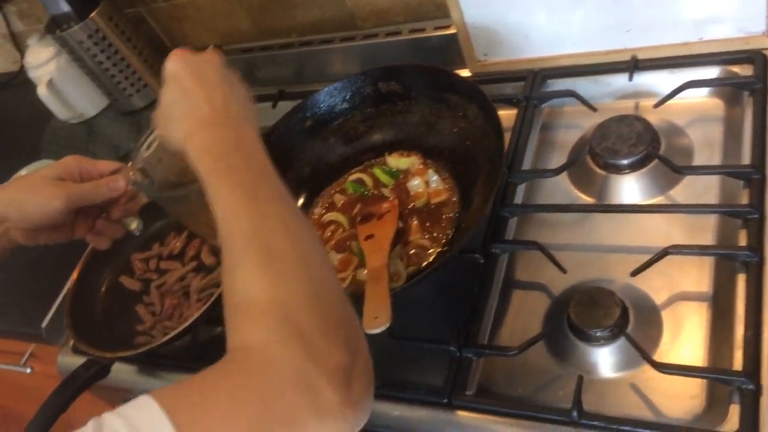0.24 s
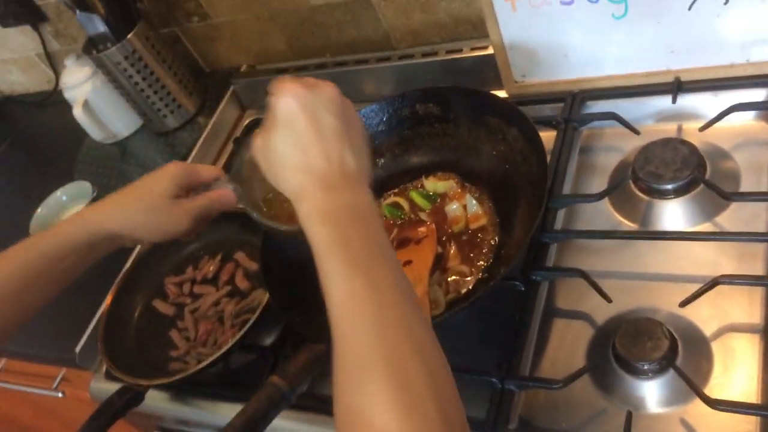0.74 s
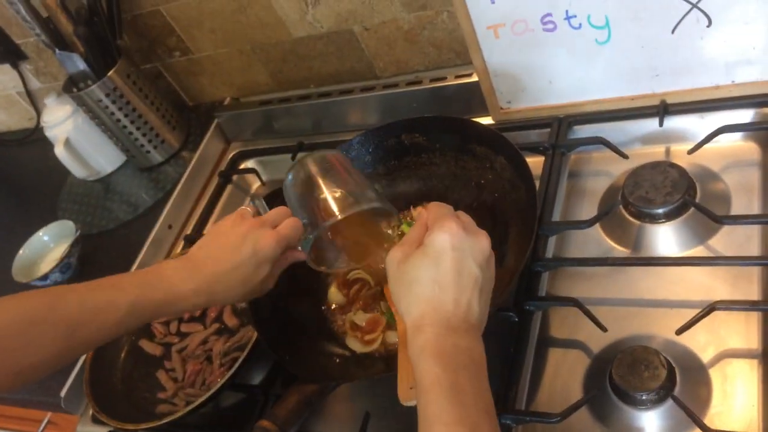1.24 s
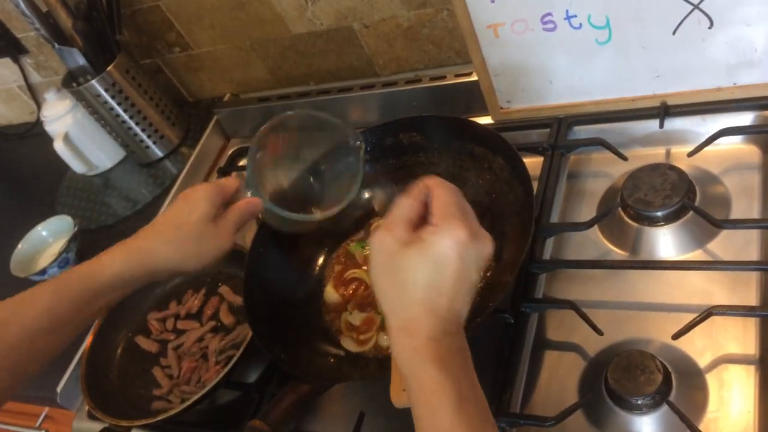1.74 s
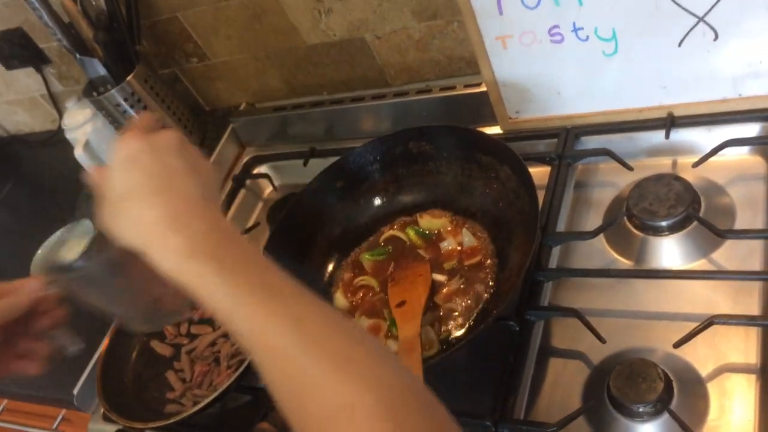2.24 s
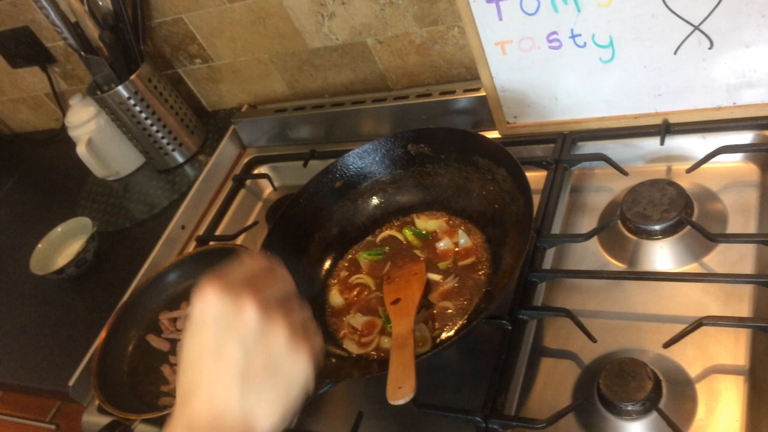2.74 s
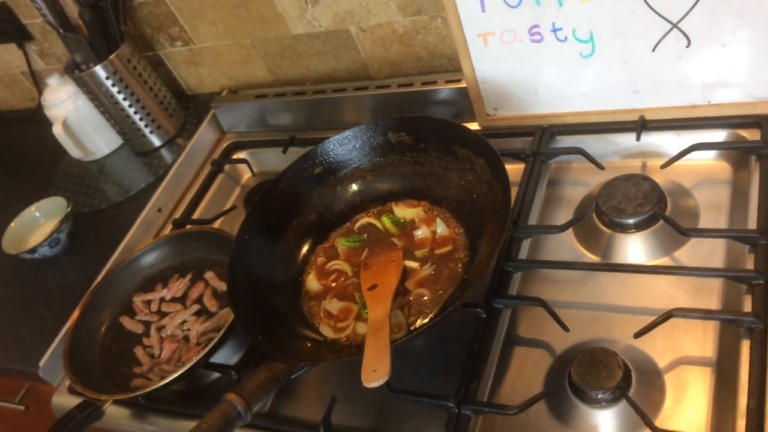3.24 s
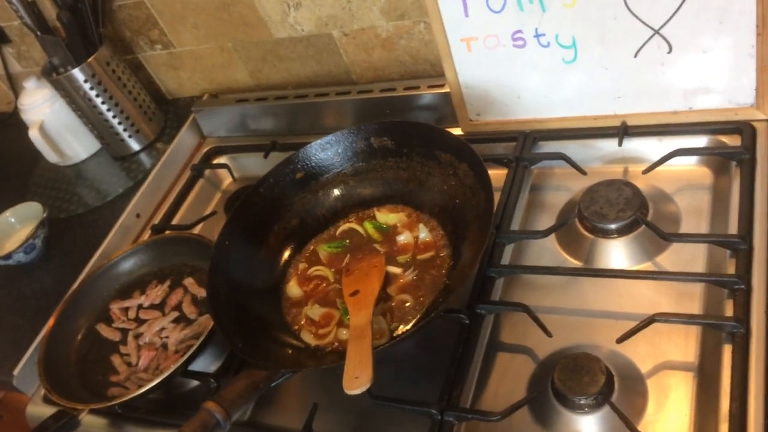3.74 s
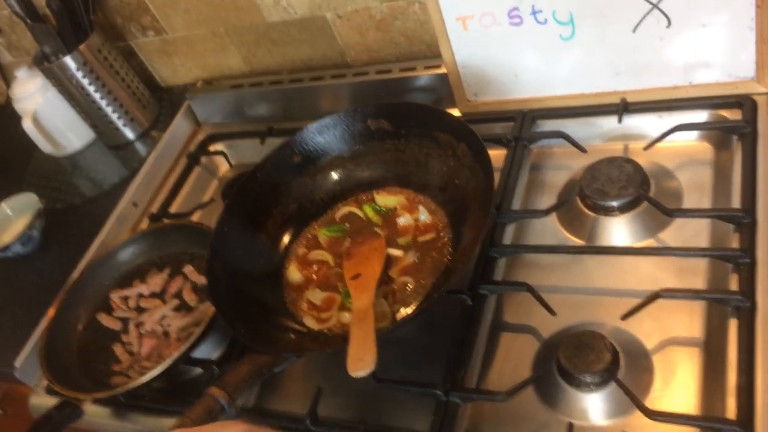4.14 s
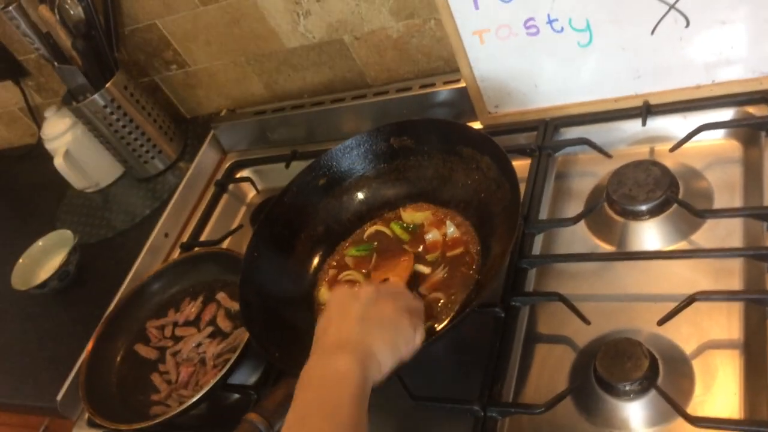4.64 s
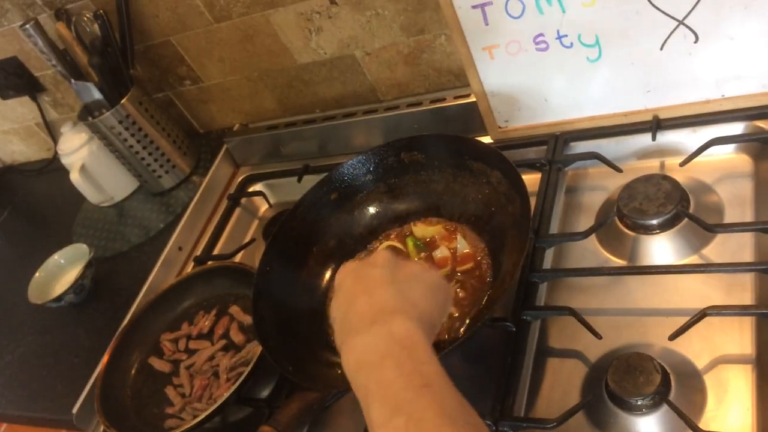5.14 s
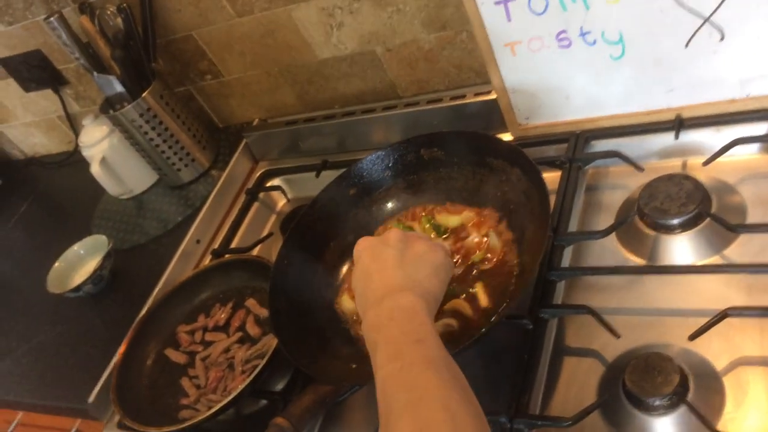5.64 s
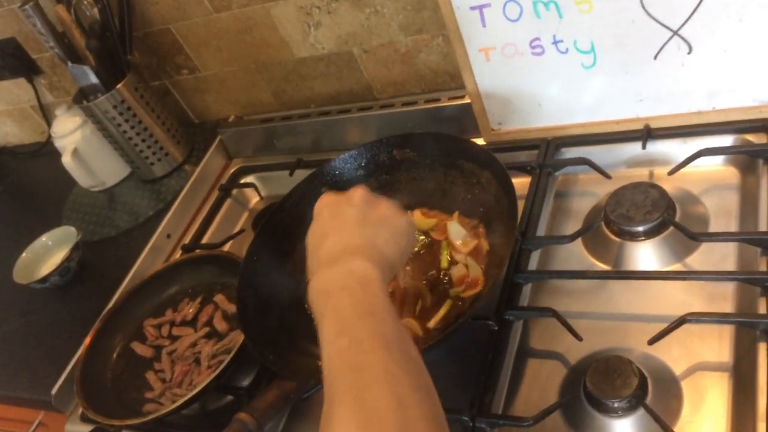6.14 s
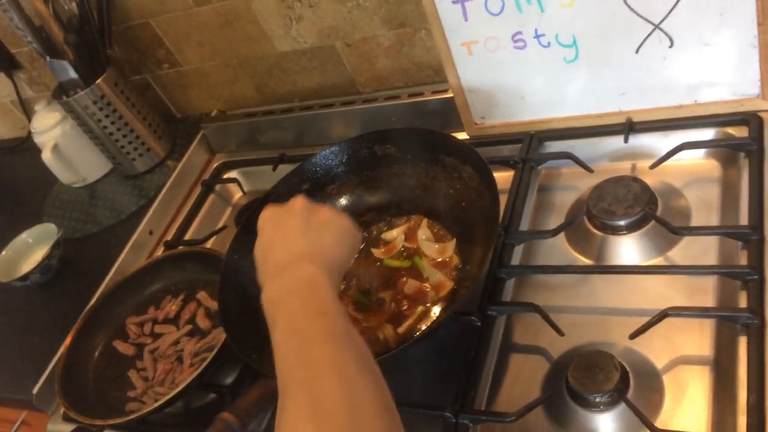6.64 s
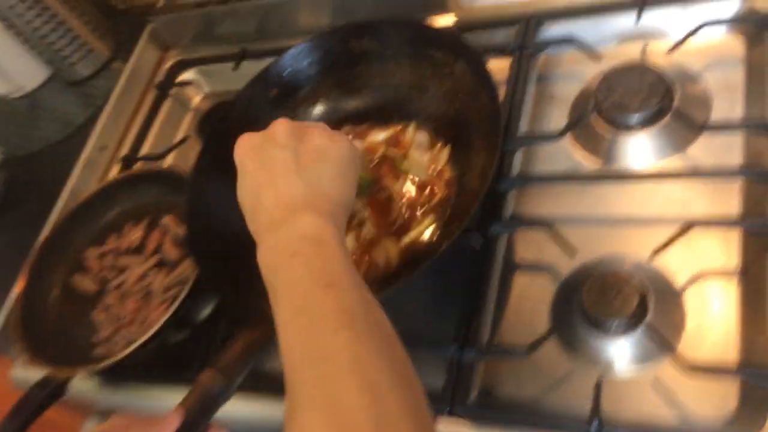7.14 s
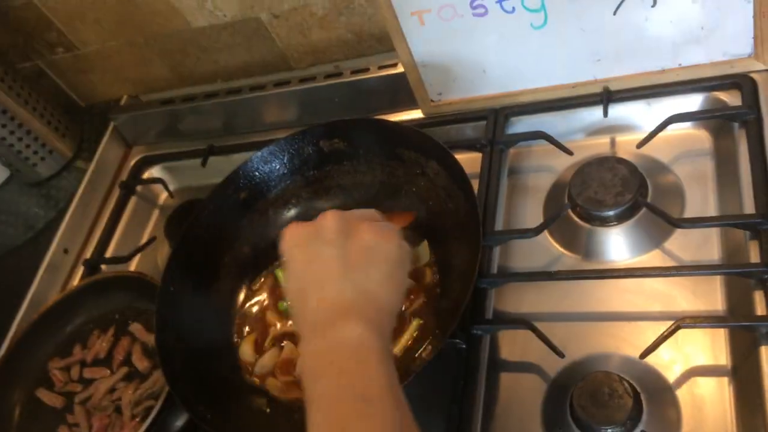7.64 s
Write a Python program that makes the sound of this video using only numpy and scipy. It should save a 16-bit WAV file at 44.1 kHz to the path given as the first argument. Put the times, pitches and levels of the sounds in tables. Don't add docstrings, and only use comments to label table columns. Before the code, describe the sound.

Close wok sizzle with a splashing hiss, glass jug rattle, a loud metallic sink clatter across the kitchen, then stirring and wooden knocks.

```python
import sys
import numpy as np
from scipy import signal
from scipy.fft import rfft, irfft
from scipy.io import wavfile
from scipy.ndimage import uniform_filter1d, minimum_filter1d

SR = 44100
rng = np.random.default_rng(int(sys.argv[2]) if len(sys.argv) > 2 else 0)


def invert_db(x):
    u = np.asarray(x, float) / 20
    return 10 ** u


def store_wav(level_fs):
    pcm = np.round(np.clip(np.atleast_2d(level_fs), -1, 1) * 32767)
    wavfile.write(sys.argv[1], SR, pcm.T.astype(np.int16))


N = 347508
T = np.arange(N) / SR

# time in seconds, level in dB.
BOIL = [(0.0, -39.5), (1.3, -38.5), (1.66, -28), (1.8, -31.5), (1.92, -33.5), (2.15, -32.5), (2.9, -36),
        (3.5, -36), (4.0, -37), (4.76, -37), (5.08, -29.5), (5.35, -35), (5.63, -20.5), (6.08, -29),
        (6.22, -25.5), (6.64, -36.5), (6.9, -36.5), (7.2, -47.5), (7.5, -38.5), (7.88, -39)]
# time in seconds, spit over boil in dB.
BARE_METAL = [(0.1, -6), (0.7, -6.5), (1.3, -1), (1.62, -2), (1.8, 0.5), (1.95, 1.5), (2.2, -3), (2.9, -5),
              (3.9, -4.5), (4.4, -3.5), (4.8, 0), (5.08, 0.5), (5.35, -1), (6.3, 1), (6.55, 4), (7.05, 5),
              (7.3, 7), (7.6, 0.5)]
# time in seconds, peak in dB.
SPURTS = [
    (0.0, -35.5),
    (0.285, -36),
    (0.55, -36),
    (1.11, -37.5),
]
# frequency in Hz, level in dB per Hz.
BOIL_COLOUR = [(150, -77), (250, -8.5), (329, -25), (370, -13.5), (670, -2), (786, -4.5), (1700, 0),
               (5100, -6), (6100, -10.5), (8000, -12.5), (10400, -51), (17600, -120)]
# frequency in Hz, level in dB per Hz.
SPIT_COLOUR = [(2940, -9), (5000, -3), (6000, -6.5), (7570, -10), (9710, -4), (11600, -5), (14200, -1.5),
               (15400, -2.5)]
# time in seconds, peak in dB, pitch in Hz.
POPS = [(0.5574, -36, 4230), (0.637, -11, 2980), (0.7544, -19, 11500), (0.7781, -6, 12200),
        (0.852, -9, 13000), (0.8936, -10, 3400), (1.0177, -8, 12000), (1.0796, -16, 4940),
        (1.112, -5, 11200), (1.106, -22, 4200), (0.106, -18, 4500), (0.128, -12, 12000),
        (0.205, -14, 11000), (0.465, -19, 4000), (0.036, -11, 12000), (0.558, -15, 9000),
        (0.576, -10, 12500), (0.587, -9, 12500), (1.784, -7, 4130), (1.919, -14, 14400), (1.9577, 3, 13800),
        (4.9057, -5, 5550), (6.808, -20, 3360), (7.149, -7, 13200), (7.265, -19, 3620)]
# time in seconds, peak in dB, pitch in Hz, length in cycles.
BUBBLES = [(0.2194, -28, 2860, 13), (0.2428, -25, 2030, 36), (0.2536, -21, 1500, 17),
           (0.278, -32, 1055, 32), (0.543, -25, 2680, 14), (0.8093, -32, 1020, 10), (1.93, -26, 2560, 25),
           (5.165, -20, 2130, 9), (7.093, -29, 2060, 15), (7.703, -30, 2000, 12), (7.7303, -27, 2020, 18)]
# time in seconds, peak in dB, pitch in Hz, length in cycles, overtone in dB.
KNOCKS = [
    (1.999, -34.5, 525, 9, -13),
    (2.225, -23, 735, 11, -20),
    (2.253, -27, 750, 7.3, -15),
    (2.266, -24, 760, 15, -15),
    (4.047, -28, 445, 5.4, -12),
    (4.323, -32.5, 425, 40, -7),
    (6.459, -31, 620, 5, -2),
    (6.905, -29, 700, 5.9, 2),
    (7.35, -22, 500, 6.2, -6),
    (7.755, -25, 475, 7.8, -26),
]

# frequency in Hz, width in Hz, level in dB.
JUG_MODES = [(1280, 39, -14), (1818, 30, -13), (2680, 170, -13), (3320, 38, -6), (3630, 34, -4),
             (4180, 60, -15), (4585, 46, -9), (5420, 29, -7.5), (6220, 68, 2), (6825, 62, 1),
             (7070, 40, -4), (7470, 47, -6), (7860, 40, -19), (8655, 26, -2.5), (9220, 38, 0.5),
             (9885, 30, -3), (10670, 22, -4.5), (11050, 24, 0), (11150, 20, -8), (11400, 50, -7),
             (11780, 37, -3), (12100, 100, -15), (12570, 29, 0), (13000, 31, -11), (13800, 40, 0),
             (14000, 55, -7), (14300, 80, -9), (14500, 50, -4), (14700, 35, -10), (15000, 45, -7),
             (15300, 28, -8)]
# start in seconds, peak in dB, brightness in dB per octave, most excited Hz.
JUG_BLOWS = [(0.0024, -15.5, 1, 7020), (0.003, -17, 0, 10800), (0.2763, -17, 2, 5420),
             (0.277, -22, 1, 10800), (0.278, -26, 0, 13400), (0.5594, -31, -8, 4230),
             (2.2255, -11, 1.5, 10800), (2.226, -10, 8, 15100), (2.23, -13, 4, 12570),
             (2.254, -12, 2, 8655), (2.2265, -15, 11.5, 8600), (2.238, -18, -5, 7200),
             (2.266, 7.5, -5.5, 3320), (2.2665, 6, 4, 6420), (2.269, 2, -2.5, 10800), (2.325, -2, -3, 6220),
             (2.327, -8, 5, 12570), (2.346, -10, 3.5, 13800), (2.379, -5, 3, 6825), (2.336, -11, 3, 3320),
             (2.347, -15, -2, 7000), (2.3525, 4, -5, 3630), (2.372, -3.5, 3, 6220), (2.4035, -6, 1, 6300),
             (2.408, 3, -3, 3630), (2.422, -12, -1, 9220), (2.445, -6, 5, 9880), (2.4496, -3, -5, 11800),
             (2.46, -9, 0, 7050), (2.483, -2, -3, 9880), (2.54, -19, 10, 11400), (2.575, -18, 2, 13700),
             (2.562, -27, -3, 6960), (3.063, 1, 0.5, 13700), (3.068, -7.5, 1, 11300),
             (3.078, -14, 4, 12570), (3.093, -9, -4, 11400), (3.095, -10, -3, 1280), (3.099, -7, 6, 7860),
             (3.145, 0.5, -1, 6750)]
# start in seconds, hold in seconds, level in dB, fade in dB per second.
JUG_RATTLE = [
    (2.232, 0.31, -8.5, 130),
    (3.064, 0.0091, -6, 114),
]
# frequency in Hz, width
# in Hz, level in dB.
SINK_MODES = [(885, 55, -2.5), (1000, 60, 1.5), (1280, 34, 2.5), (1500, 130, -1), (1830, 24, -1),
              (2160, 79, 2), (2320, 99, 1.5), (2780, 120, -11), (3320, 36, 3), (3670, 38, 0.5),
              (3740, 22, -7), (4150, 90, -5), (4570, 67, -8), (5000, 90, -12), (5420, 30, -10),
              (5790, 37, -13), (6230, 57, 1), (6760, 42, -3.5), (7020, 34, -4), (7400, 65, -10),
              (7870, 56, -6), (8700, 24, -9), (9280, 32, -4), (9780, 23, -9), (11000, 110, -2),
              (11800, 100, -5), (12570, 41, -11), (13000, 45, -13), (13700, 60, -6), (14100, 40, -13),
              (14900, 85, -10)]
# start in seconds, peak in dB, brightness in dB per octave, most excited Hz.
SINK_BLOWS = [(3.2242, -0.5, -1.5, 6240), (3.233, -2.5, 0.5, 880), (3.2396, 5.5, 1, 3450),
              (3.245, -3.5, -0.5, 1257), (3.251, 1, 0.8, 6160), (3.26, -3, 0.22, 2160),
              (3.272, -6, 3, 3300), (3.289, -2.5, 2.1, 6460), (3.308, -6, 5, 3670), (3.313, -13, -3, 1270),
              (3.351, -11, 2, 3420), (3.385, -22, -0.6, 1000)]
# start in seconds, hold in seconds, level in dB, fade in dB per second.
SINK_RATTLE = [
    (3.23, 0.012, -4.5, 111),
]
# frequency in Hz, width in Hz, level in dB.
SPOON_MODES = [(4480, 12, -4), (5080, 11, -1), (6590, 74, -1), (6900, 170, 6), (7110, 38, -8),
               (7590, 36, -7), (8480, 51, -1), (10600, 150, -6), (12000, 41, 1), (12700, 170, -1),
               (13100, 23, -12), (15000, 52, -17)]
# start in seconds, peak in dB, brightness in dB per octave, most excited Hz.
SPOON_BLOWS = [
    (3.5596, -12, 0.0024, 12000),
    (3.569, -21, 0, 6590),
    (3.613, -29, 0, 6590),
    (3.6267, -23, 0, 8480),
]
# frequency in Hz, width in Hz, level in dB.
POT_MODES = [(120, 20, -8.5), (180, 13, -8.5), (415, 67, 0.5), (305, 46, -9), (538, 68, -2),
             (700, 103, 4.5), (833, 46, 2), (1000, 110, 7), (1160, 94, 1.5), (1330, 49, 5.5),
             (1450, 15, -4), (1786, 39, -2), (2030, 66, -6), (2350, 71, -6), (2574, 39, -7.5),
             (2930, 40, -7), (3960, 49, -12), (4340, 40, -14), (4600, 40, -24), (5040, 170, -13),
             (5750, 46, -25), (6100, 120, -13)]
# start in seconds, peak in dB, brightness in dB per octave, most excited Hz.
POT_BLOWS = [(3.6695, -6, 2, 737), (3.672, -9.5, 2, 2030), (3.81, -26, 3, 1450), (3.846, -18, -3, 1450),
             (3.677, -10.5, 0.5, 1330), (3.69, -14, -8, 1330), (3.697, -10, 4, 1910),
             (3.707, -4.5, 2, 2930), (3.709, -10, -0.5, 120), (3.72, -7, -2, 1450), (3.734, -6.5, 5, 5050),
             (3.742, -13, 6, 3950), (3.746, -9, -1.5, 405), (3.748, -14, -1, 2930), (3.768, -15, 4.5, 2930),
             (3.796, -20, -1, 3960), (3.84, -28, 2, 3960), (3.886, -27, -2, 2930), (3.777, -15, -5, 1450)]
# start in seconds, hold in seconds, level in dB, fade in dB per second.
POT_RATTLE = [
    (3.61, 0.037, -17, 200),
    (3.676, 0.076, -12, 78.5),
]
# frequency in Hz, width in Hz, level in dB.
BOWL_MODES = [(307, 30, -13.5), (428, 30, -6.5), (638, 65, -3.5), (865, 92, -0.5), (954, 23, -3.5),
              (1055, 20, -1), (1257, 73, -0.5), (1415, 38, -4), (1657, 35, -7), (1980, 33, -15),
              (2646, 35, -11), (2820, 25, -10), (2915, 22, -1), (3760, 70, -11), (4075, 100, -7),
              (4520, 46, -9), (4880, 14, -9.5), (4950, 17, -11), (5230, 70, -16)]
# start in seconds, peak in dB, brightness in dB per octave, most excited Hz.
BOWL_BLOWS = [(4.383, -11, -5, 2100), (4.389, -22, -3, 950), (4.395, -8.5, -2, 2910), (4.396, -13, 1, 4950),
              (4.398, -7.5, -0.5, 910), (4.407, -11, 0.5, 2930), (4.433, -9.5, 4, 1410),
              (4.434, -18, 3, 2915), (4.475, -15, -5, 1060), (4.476, -19, -6, 2915),
              (4.524, -15.5, 4, 4880), (4.526, -16, 6, 4075), (4.53, -10, -1, 865), (4.544, -14, 5, 1060),
              (4.552, -19, -5, 2820), (4.594, -25, 1, 2915)]
# start in seconds, hold in seconds, level in dB, fade in dB per second.
BOWL_RATTLE = [
    (4.4, 0.011, -5, 99),
    (4.53, .01, -8, 90),
]
# frequency in Hz, width in Hz, level in dB.
LID_MODES = [(130, 32, -15), (307, 40, -4), (415, 20, 1.5), (670, 25, 1.5), (790, 52, -1), (850, 42, -2.5),
             (937, 37, -1.5), (1120, 40, -6), (1287, 59, -2), (1378, 34, -0.5), (1433, 43, -2.5),
             (1750, 43, -18), (2510, 70, -7), (2750, 70, -8)]
# start in seconds, peak in dB, brightness in dB per octave, most excited Hz.
LID_BLOWS = [(4.846, -18.5, 1, 810), (4.858, -19, 2, 1400), (4.875, -22, 7, 930), (4.882, -20.5, 6.5, 1400),
             (4.894, -25, 5.5, 1400), (4.929, -23, 1, 1400), (4.934, -21, 1, 910), (4.946, -19, -7, 800),
             (4.968, -14.5, -6.5, 850), (5.318, -18, -3, 130), (5.352, -26, -7, 415), (5.385, -28, 1, 670),
             (5.41, -27, 4, 1380)]
# start in seconds, hold in seconds, level in dB, fade in dB per second.
LID_RATTLE = [
    (4.86, 0.083, -25, 109),
    (5.33, 0.12, -29.5, 200),
]

# frequency in Hz, width in Hz, level in dB.
JUG_AIR = [(541, 27, -5.5), (670, 66, 1.5), (766, 74, -4)]
# frequency in Hz, level in dB per Hz.
KITCHEN_COLOUR = [(120, -66), (200, -12), (321, -5.5), (664, 4.5), (796, -4.5), (921, 5.5), (1210, -5),
                  (2090, 3.5), (4640, -4), (6440, -13.5), (13600, -4.5), (15400, -20)]
# time in seconds, level in dB.
HAND = [(0.0, -30.5), (0.1, -19), (0.6, -26), (1.78, -43), (2.24, -20.5), (2.8, -25), (3.16, -19.5),
        (3.5, -39), (4.24, -27), (4.7, -22.5), (6.06, -21), (6.91, -29.5), (7.31, -28.5), (7.5, -44),
        (7.66, -21), (7.8, -26), (7.88, -39)]
# time in seconds, handling rumble in dB, room boom in dB.
JOLTS = [(0.09, -48, -70), (2.56, -33, -41), (2.86, -47, -49), (3.1, -41, -51), (3.27, -34, -47),
         (3.71, -36, -29), (4.24, -38, -38), (4.45, -40, -30), (4.8, -40, -40), (5.331, -62, -35),
         (5.59, -40, -58), (6.45, -52, -71)]


def sizzle():
    boil_db = np.interp(T, *np.transpose(BOIL))
    spit_db = boil_db + np.interp(T, *np.transpose(BARE_METAL))
    spurts = puffs(*np.transpose(SPURTS), rise_s=0.023, fall_s=0.048)
    swell = walk(6.44)
    drops = crackle(500, 1.5)
    body = rng.standard_normal(N) + level(drops, -11) + level(fizz(40, 28), -15.5)
    body = level(colour(body, BOIL_COLOUR), 0)
    body *= np.hypot(invert_db(boil_db), invert_db(1) * spurts) * invert_db(0.5 * swell + 2.8 * walk(25))
    spit = rng.standard_normal(N) + level(drops, -14.0) + level(crackle(2500, 2.2), -2.5)
    spit = level(colour(spit, SPIT_COLOUR), 0)
    spit *= np.hypot(invert_db(spit_db), spurts) * invert_db(0.26 * swell + 2.3 * walk(16))
    pops, bubbles = np.array(POPS), np.array(BUBBLES)
    popping = bursts(pops, np.full(len(pops), 2.2), 0.033)
    bubbling = bursts(bubbles[:, :3], bubbles[:, 3] * 2.64, 0.071)
    return body + spit + popping + bubbling


def fizz(rate, cycles):
    sizes_hz = np.geomspace(900, 5000, num=9)
    return sum(level(ring(crackle(rate, 4.3), hz, cycles / hz), 0) for hz in sizes_hz)


def crackle(rate, scatter_db):
    on = rng.random(N) < rate / SR
    size_db = scatter_db * np.minimum(rng.exponential(size=N), 2.2)
    return on * rng.standard_normal(N) * invert_db(size_db)


def bursts(rows, cycles, glide):
    out = np.zeros(N + 8192)
    t = np.arange(8192) / SR
    for (s, db, hz), turns in zip(rows, cycles):
        life = t * hz / turns
        tone = np.sin(2 * np.pi * hz * t * (1 + glide * life))
        out[int(s * SR):][:8192] += invert_db(db) * np.exp(-3 * life) * tone
    return out[:N]


def spatula():
    s, db, hz, cycles, over_db = np.transpose(KNOCKS)
    s, db = s + 0.002, db + 5
    partials = [(db, 1, 1), (db + over_db, 1.55, 1.3), (db + over_db - 7, 2.6, 1.6), (db - 12, 1.04, 3.5)]
    taps = sum(bursts(np.c_[s, part_db, hz * ratio], cycles * longer, 0.0049)
               for part_db, ratio, longer in partials)
    return signal.lfilter(*signal.butter(2, 300, "high", fs=SR), taps)


def dishes():
    jug = clatter(JUG_MODES, JUG_BLOWS, JUG_RATTLE, t60=0.14, blow_db=-26, rattle_db=-27.5, crack_db=-0.41,
                  crack_hz=(2500, 15000), thud_db=-60, rise_s=0.00037, spot_db=1.5, turn_db=6.0)
    sink = clatter(SINK_MODES, SINK_BLOWS, SINK_RATTLE, t60=0.17, blow_db=-20.0, rattle_db=-22.5, crack_db=7.1,
                   crack_hz=(400, 7500), thud_db=1.4, rise_s=0.00059)
    spoon = clatter(SPOON_MODES, SPOON_BLOWS, [], t60=0.12, blow_db=-15.5, rattle_db=0, crack_db=3,
                    crack_hz=(4000, 14000), thud_db=-34, rise_s=0.0023)
    pot = clatter(POT_MODES, POT_BLOWS, POT_RATTLE, t60=0.17, blow_db=-18.5, rattle_db=-27.5, crack_db=7.7,
                  crack_hz=(300, 4200), thud_db=5.8, rise_s=0.00099)
    bowl = clatter(BOWL_MODES, BOWL_BLOWS, BOWL_RATTLE, t60=0.15, blow_db=-15.5, rattle_db=-25.0, crack_db=8,
                   crack_hz=(350, 3500), thud_db=11.0, rise_s=0.0016)
    lid = clatter(LID_MODES, LID_BLOWS, LID_RATTLE, t60=0.13, blow_db=-15.5, rattle_db=-19, crack_db=10.8,
                  crack_hz=(250, 2500), thud_db=13.7, rise_s=0.002)
    return jug + sink + spoon + pot + bowl + lid


def clatter(modes, blows, rattles, t60, blow_db, rattle_db, crack_db, crack_hz, thud_db, rise_s,
            rate=220, spot_db=1.0, turn_db=4.0, favour_db=12):
    hits = np.array(blows) + [0, blow_db, 0, 0]
    for start, hold, db, fade in rattles:
        since = np.sort(rng.random(size=110)) * 110 / rate
        fading_db = db + rattle_db - fade * np.maximum(since - hold, 0)
        hits = np.r_[hits, np.c_[start + since, fading_db, 0 * since, 1 + 0 * since]]
    when, hit_db, bright, favoured_hz = hits.T
    first = int(when.min() * SR)
    size = min(N, int(when.max() * SR) + SR // 2) - first
    at = (when * SR).astype(int) - first

    chance = rng.standard_normal((3, len(hits), 64))
    turn = uniform_filter1d(chance[1], size=16, axis=0) * 4
    turn[:len(blows)] = 0
    share = invert_db(spot_db * chance[0] + turn_db * turn) * np.sign(chance[2])

    middle = np.sqrt(modes[0][0] * modes[-1][0])
    out, slow = np.zeros(N), np.exp(-1 / (rise_s * SR))
    heard = out[first:first + size]
    for k, (hz, width, db) in enumerate(modes):
        near = np.exp(-(np.log2(hz / favoured_hz) / 0.1) ** 2)
        push_db = db + hit_db + bright * np.log2(hz / middle) + favour_db * near
        mode_t60 = t60 * (middle / hz) ** 0.017 * 30 / (30 + width)
        for side in (0, 1):
            push = np.bincount(at, invert_db(push_db) * share[:, 2 * k + side], size)
            pitch = hz + (side - .5) * 0.94 * width
            pole = slow * np.exp(2j * np.pi * pitch / SR)
            swelling = signal.lfilter([1 - slow], [1, -pole], push)
            heard += ring(swelling, pitch, mode_t60)

    touches = np.bincount(at, invert_db(2 * hit_db), size)
    trail = signal.lfilter([1], [1, -np.exp(-1 / (0.014 * SR))], touches)
    trail = signal.lfilter([1 - slow], [1, -slow], trail)
    burst = np.sqrt(trail) * rng.standard_normal(size)
    crack = signal.butter(2, crack_hz, "band", fs=SR)
    thud = signal.butter(2, (50, 220), "band", fs=SR)
    heard += invert_db(crack_db) * signal.lfilter(*crack, burst)
    heard += invert_db(thud_db) * signal.lfilter(*thud, burst)
    return out


def ring(x, hz, t60):
    pole = np.exp(2j * np.pi * hz / SR - np.log(1000) / (t60 * SR))
    return signal.lfilter([1], [1, -pole], x).imag


def room(x):
    t60_s, tail_db, dull_hz = 0.46, -3.5, 4600
    t = np.arange(SR // 2) / SR
    noise = rng.standard_normal(len(t))
    dull = signal.lfilter(*signal.butter(1, dull_hz, fs=SR), noise)
    tail = dull + (noise - dull) * np.exp(-t / 0.048)
    tail *= 1000 ** (-t / t60_s) * np.clip(t / 0.0036, 0, 1)
    tail *= invert_db(tail_db) / np.sqrt(np.sum(tail ** 2))
    return x + signal.fftconvolve(x, tail)[:N]


def swirl():
    stir_db, pour_s, pour_db, put_down_s = -42.5, 0.95, -43, 2.6
    db = np.where(T < pour_s, stir_db, pour_db) - 400 * np.maximum(T - put_down_s, 0)
    slosh = rng.standard_normal(N) + level(crackle(200, 2.0), -2.6)
    hum = sum(invert_db(mode_db) * level(ring(slosh, hz, 4.2 / width), 0) for hz, width, mode_db in JUG_AIR)
    return level(hum, 0) * invert_db(db + 6.4 * walk(13.8))


def sway():
    s, rumble_db, boom_db = np.transpose(JOLTS)
    slow = colour(rng.standard_normal(N), [(1.2, -4.5), (4, 16.5), (9, 3.0), (19, -25.0)])
    rumble = colour(rng.standard_normal(N), [(19, 3.0), (45, -6.5), (80, -11.0)])
    boom = colour(rng.standard_normal(N), [(70, -8.0), (120, 2.5), (200, -13.5), (330, -4.5)])
    rumble_gain = invert_db(-49) + puffs(s, rumble_db, rise_s=0.046, fall_s=0.11)
    boom_gain = invert_db(-60.5) + puffs(s, boom_db, rise_s=0.046, fall_s=0.15)
    pressure = level(slow, 0) * invert_db(np.interp(T, *np.transpose(HAND)))
    return pressure + level(rumble, 0) * rumble_gain + level(boom, 0) * boom_gain


def kitchen():
    drops = crackle(900, 4.6)
    simmer = colour(rng.standard_normal(N) + level(drops, 0), KITCHEN_COLOUR)
    return level(simmer, -37) * invert_db(0.31 * walk(17))


def puffs(when, db, rise_s, fall_s):
    late = T - np.reshape(when, (-1, 1))
    shape = np.exp(np.minimum(late / rise_s, -late / fall_s))
    return np.sqrt(invert_db(2 * np.asarray(db)) @ shape ** 2)


def walk(rate):
    k = int(SR / rate)
    steps = np.repeat(rng.standard_normal(N // k + 1), k)
    return 0.51 * uniform_filter1d(uniform_filter1d(steps, k), k)[:N]


def colour(x, points):
    hz, db = np.transpose(points)
    grid = np.fft.rfftfreq(N, 1 / SR) + 1e-3
    curve_db = np.interp(np.log(grid), np.log(hz), db, db[0] - 16, db[-1] - 19.5)
    return irfft(rfft(x) * invert_db(curve_db), N)


def level(x, db):
    return x * invert_db(db) / np.sqrt(np.mean(x ** 2))


def scene():
    mono = room(dishes()) + spatula() + sizzle() + swirl() + kitchen() + sway()
    return np.array([mono, mono])


def roll_off(x):
    return signal.sosfilt(signal.butter(12, 15340, fs=SR, output="sos"), x)


def record(dry):
    top_hz, limit, hold_s = 15600, 0.84, 0.00014
    low_pass = signal.ellip(10, .2, 90, top_hz, fs=SR, output="sos")
    cut = signal.sosfilt(low_pass, dry)
    need = np.minimum(limit / (np.abs(cut) + 1e-9), 1)
    hold = int(hold_s * SR)
    gain = uniform_filter1d(minimum_filter1d(need, 2 * hold + 1), hold)
    return roll_off(cut * gain)


dry = scene()
out = record(dry)
store_wav(out)
```